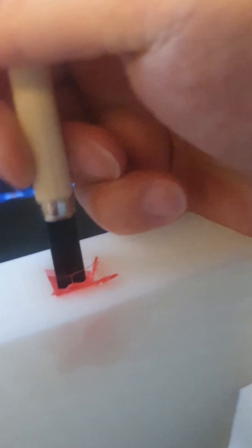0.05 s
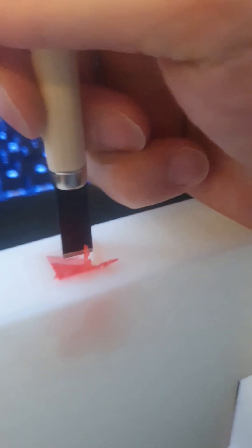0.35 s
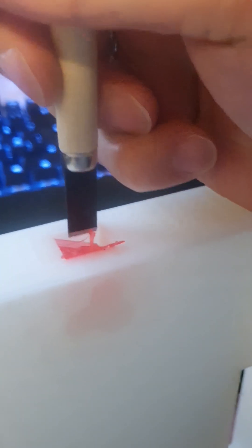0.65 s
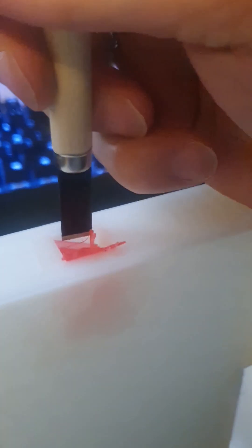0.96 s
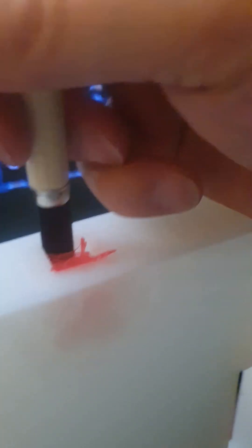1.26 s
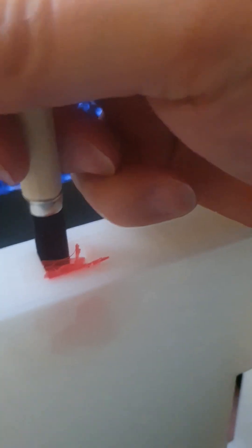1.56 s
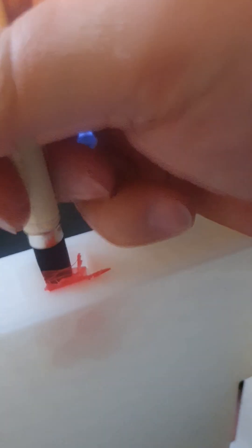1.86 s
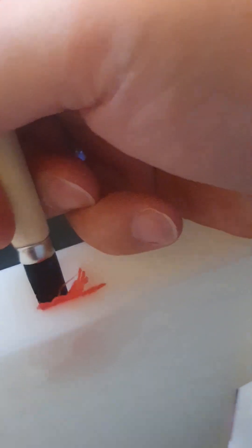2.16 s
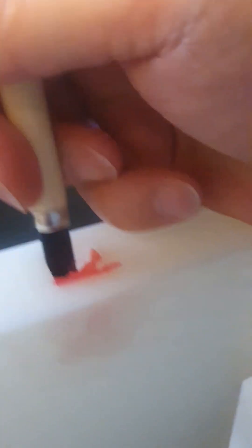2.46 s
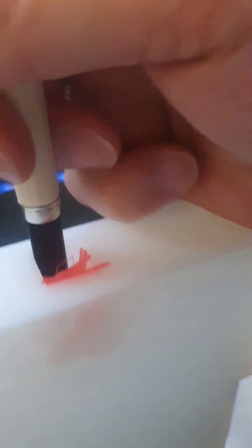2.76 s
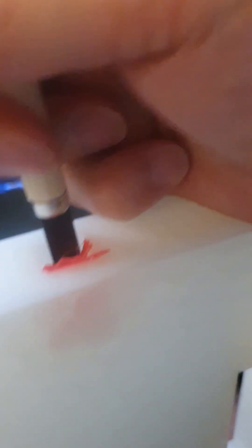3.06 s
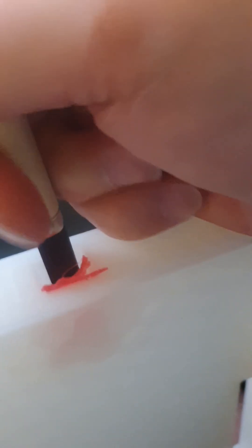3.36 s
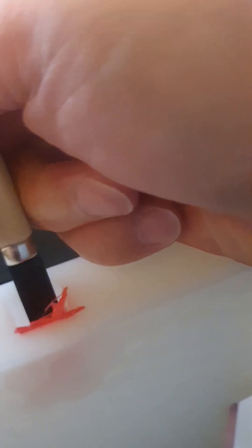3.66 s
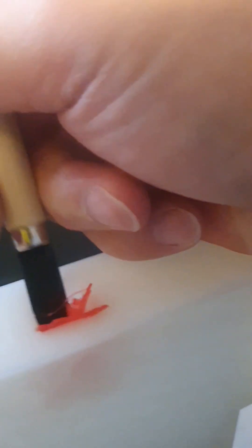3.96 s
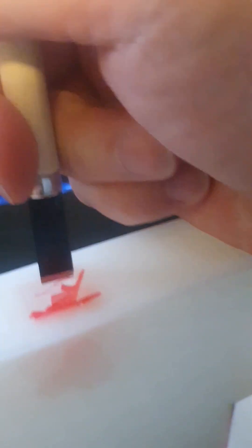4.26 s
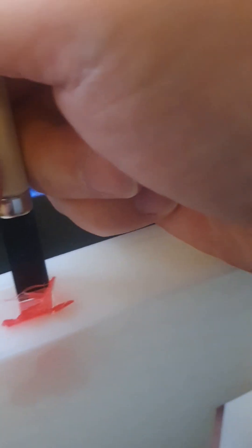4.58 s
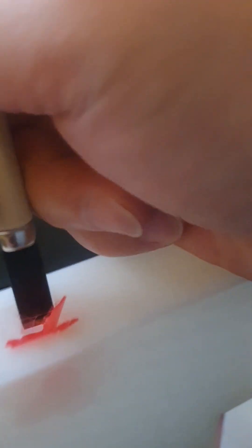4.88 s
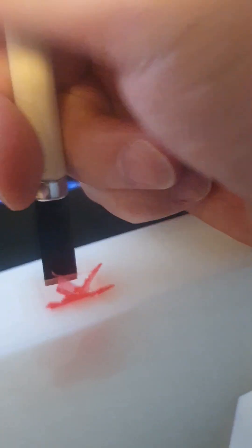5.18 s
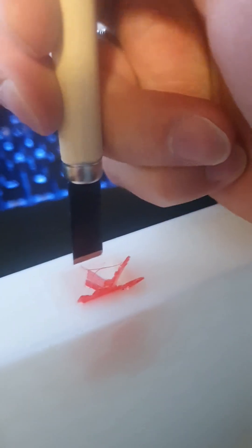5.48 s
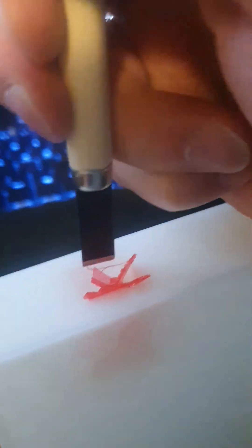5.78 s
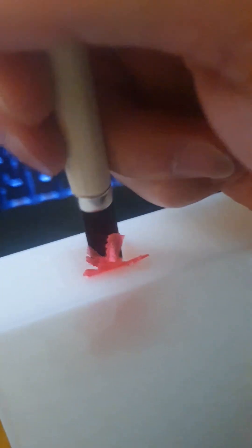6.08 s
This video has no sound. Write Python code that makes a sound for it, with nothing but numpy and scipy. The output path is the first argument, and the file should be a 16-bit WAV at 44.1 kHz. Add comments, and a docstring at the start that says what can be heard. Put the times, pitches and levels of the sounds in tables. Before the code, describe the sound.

A small chisel blade pries thin support struts off a hollow plastic 3D print, heard very close in a small room over a quiet, steady computer fan. It opens with a short scrape and a few sharp clicks in the first 0.3 seconds. Sparse light ticks follow, with a small crackle at 1.3 seconds. A loud, bright snap comes at 1.7 seconds, then a hollow knock near 2 and a duller, crunchy scrape until about 2.3. Faint creaks and scattered clicks continue, with a sharp tick near 3 seconds. Around 3.6 a second loud break crunches and knocks, a freed strut rings very briefly, and the blade rasps and creaks until about 4.2. From 4.6 seconds lighter ticks and a soft scrape lead into a faint sliding rub around 5.1 to 5.5. A few small clicks and a brief scrape come near 6 seconds.

```python
"""Small room, close up: a chisel blade pries thin support struts off a hollow 3D print.
Each break is a quick run of micro-fractures that knock the shell, ring struts and blade, and crack.
In between, the edge sticks and slips over layer lines, the sliding blade creaks, freed struts ring.
A computer fan hums behind. The treble sinks in five short spells."""
import sys
import numpy as np
from scipy import signal
from scipy.fft import rfft, irfft, next_fast_len
from scipy.io import wavfile
from scipy.ndimage import uniform_filter1d, minimum_filter1d

SR = 44100
rng = np.random.default_rng(int(sys.argv[2]) if len(sys.argv) > 2 else 0)


def waveform_to_disk(signal):
    """Save audio, clipped to [-1, 1], as 16-bit WAV at the path in sys.argv[1]."""
    frames = np.transpose(np.atleast_2d(signal))
    scaled = np.clip(frames, -1, 1) * 32767
    samples = np.round(scaled).astype(np.int16)
    wavfile.write(sys.argv[1], SR, samples)


N = 270333
TIME_S = np.arange(N) / SR

# fan air noise (frequency [Hz], relative density [dB])
FAN_SPECTRUM = [(26, -14.5), (45, -1.5), (125, -6.5), (290, -9.5), (461, -7.5), (917, -12), (1990, -19.5),
                (5410, -31), (9000, -51), (13000, -87.5)]
# (frequency [Hz], left minus right [dB])
FAN_PAN = [(40, -11), (130, 4.5), (450, 11), (900, -2.5), (2200, 6.5), (3500, 7.5), (5500, 22.5)]
# (frequency [Hz], left-right correlation [-1..1])
FAN_CORRELATION = [(60, 0.59), (450, -0.43), (950, -0.67), (1600, 0.56), (4000, 0.27)]
# (frequency [Hz], width [Hz], level [dB], left minus right [dB])
FAN_MODES = [(464.8, 14, -54.5, 8), (923.4, 12, -61, 8.5)]
# blade slides (start [s], end [s], resonance [Hz], width [Hz], level [dB])
RUB_STROKES = [(0.017, 0.268, 1570, 1800, -45.5), (2.5, 2.74, 1770, 1490, -51.5),
               (2.848, 3.123, 3040, 130, -51), (3.685, 3.878, 2950, 600, -33.5),
               (5.12, 5.538, 2270, 1500, -49), (5.425, 5.558, 7400, 8100, -56)]
# edge drags (start [s], end [s], level [dB], bite depth [0..1])
SCRAPE_STROKES = [(0.028, 0.128, -38.5, 0.12), (0.123, 0.249, -45.5, 0.15), (0.265, 0.318, -42, 0.39),
                  (0.975, 1.02, -46, 0.19), (1.907, 1.955, -40.5, 0.16), (2.091, 2.215, -31, 0.69),
                  (2.376, 2.394, -41, 0.3), (2.629, 2.692, -48.5, 0.42), (3.296, 3.56, -47, 0),
                  (3.721, 3.98, -33.5, 0.98), (4.111, 4.226, -35.5, 0.33), (4.979, 5.094, -47.5, 0.77),
                  (6.048, 6.125, -41, 0.13)]
# shallow favours crack, deep favours shell (bite depth [0..1], shell [dB], struts [dB], crack [dB])
BITE_MIX = [(0, -18.5, -15.5, -3), (.3, -12, -1, 4), (0.503, -9.5, -1.5, -9), (.7, -2, -0.5, -13),
            (.8, -9.5, 7.5, -23), (1, 3.5, -5.5, -25)]
# hollow print (frequency [Hz], width [Hz], gain [dB])
PRINT_MODES = [(72, 30, -10), (340, 85, -9.5), (543, 75, -6.5), (853, 246, 0.5), (943, 140, 2.5),
               (1140, 150, 0), (1560, 300, -3.5)]
# struts and blade (frequency [Hz], width [Hz], gain [dB])
STRUT_BLADE_MODES = [(1940, 550, -5.5), (2274, 480, -2.5), (2713, 560, -2.5), (3316, 410, -0.5),
                     (3930, 680, -9.5), (5150, 1200, -14)]
# parting plastic (frequency [Hz], width [Hz], gain [dB])
FRACTURE_MODES = [(4636, 900, 1.5), (5610, 810, 5.5), (6900, 1500, -0.5), (7850, 1900, -4.5),
                  (11290, 6000, -10.5), (14900, 520, -6)]
# supports give way (time [s], length [s], level [dB], bite depth [0..1])
SUPPORT_BREAKS = [(0.125, 0.013, -26.5, 0), (0.1611, 0.001, -20, 0), (0.264, 0.00053, -22.5, 0.57),
                  (0.748, 0.00087, -30, 0.22), (0.929, 0.0039, -34, 0.34), (1.2916, 0.0053, -24, 0.32),
                  (1.3, 0.032, -27.5, 0.25), (1.6214, 0.0016, -30.5, 0.35), (1.7019, 0.017, -12.5, 0.14),
                  (1.762, 0.00023, -37, 0.1), (1.86, 0.004, -26, 0.71), (1.935, 0.00066, -30, 0.32),
                  (1.9488, 0.0078, -19, 0.72), (2.062, 0.0024, -22, 0.48), (2.127, 0.0069, -20, 0.95),
                  (2.136, 0.049, -22, 0.98), (2.146, 0.0022, -20, 0.72), (2.194, 0.00044, -39, 0.57),
                  (2.225, 0.0029, -25.5, 0.46), (2.241, 0.0015, -27, 0.65), (2.355, 0.004, -36, 0.97),
                  (2.9622, 0.0053, -22.5, 0.28), (3.038, 0.0016, -27, 0.04), (3.354, 0.0019, -24.5, 0.18),
                  (3.5232, 0.00033, -20, 0.11), (3.628, 0.048, -26.5, 0.43), (3.651, 0.038, -13, 0.94),
                  (3.664, 0.0044, -16, 0.98), (3.779, 0.00078, -20, 0.93), (3.8053, 0.0024, -22.5, 0.92),
                  (3.95, 0.0021, -28, 0.53), (4.063, 0.0024, -32, 0.7), (4.1012, 0.0019, -25, 0.01),
                  (4.129, 0.0032, -22.5, 0.18), (4.181, 0.0015, -30, 0.33), (4.605, 0.0022, -25.5, 0),
                  (4.78, 0.0064, -36, 0.39), (4.7995, 0.0011, -26, 0.01), (4.893, 0.0033, -28, 0),
                  (4.971, 0.012, -37.5, 0.82), (5.048, 0.0023, -30.5, 0.5), (5.121, 0.025, -36, 0.86),
                  (5.817, 0.0013, -33.5, 0.52), (6.091, 0.0015, -36, 0.23)]
# strut freed or hit (time [s], pitch [Hz], decay to 1/e [cycles], level [dB])
STRUT_KNOCKS = [(0.761, 2155, 3.3, -41.5), (1.953, 993, 9.2, -20.5), (2.687, 1560, 1.5, -40),
                (2.962, 2320, 3.7, -30), (2.962, 5620, 27, -21.5), (3.662, 2037, 33, -18.5),
                (3.936, 1500, 3.4, -35), (4.2385, 2150, 2.5, -38.5), (5.2, 1795, 2.2, -42.5),
                (5.248, 1700, 2.4, -46)]
# treble dips (start [s], end [s], lower edge [Hz])
TREBLE_DIPS = [(1.76, 2.36, 4930), (2.4, 2.609, 3450), (3.573, 4.057, 4310), (4.955, 5.114, 4550),
               (5.115, 5.405, 3300)]
# (frequency [Hz], T60 [s], level [dB])
ROOM_TAIL = [(203, 0.15, -23), (1262, 0.16, -11), (2950, 0.19, -11), (7000, 0.13, -7), (15000, 0.15, -10)]
# right port against left (frequency [Hz], gain [dB])
RIGHT_PORT = [(300, 1), (1700, 1), (2200, 4.5), (2900, -7.5), (4200, -10.5), (6200, -25)]


def from_db(db):
    """Decibels to gain."""
    return 10 ** (np.asarray(db) / 20)


def unit_rms(x):
    """Scale to unit power."""
    return x / np.sqrt(np.mean(x ** 2) + 1e-20)


def at_level(sound, db, window_s):
    """Set each channel's rms over the opening window."""
    power = np.mean(sound[:, :int(window_s * SR)] ** 2, axis=1, keepdims=True)
    return sound * from_db(db) / np.sqrt(power + 1e-20)


def at_hz(points, hz):
    """Interpolate over log frequency."""
    known_hz, values = np.transpose(points)
    return np.interp(np.log(np.maximum(hz, 1)), np.log(known_hz), values)


def butter(x, kind, hz, order=2):
    """Butterworth filter."""
    return signal.sosfilt(signal.butter(order, hz, kind, fs=SR, output="sos"), x)


def resonate(x, hz, width_hz):
    """One resonance, unit peak gain."""
    r = np.exp(-np.pi * width_hz / SR)
    feedback = [1, -2 * r * np.cos(2 * np.pi * hz / SR), r * r]
    return signal.lfilter(np.array([1, 0, -1]) * (1 - r * r) / 2, feedback, x + 1e-18)


def add(track, time_s, sound):
    """Mix a sound into a track."""
    start = max(round(time_s * SR), 0)
    track[:, start:start + sound.shape[1]] += sound[:, :N - start]


def grains(size, per_s, spread_db):
    """Random clicks of uneven size and sign."""
    sizes = from_db(spread_db * np.minimum(rng.exponential(1, size), 4))
    return (rng.random(size) < per_s / SR) * sizes * rng.choice([-1, 1], size)


def evened(paths, share=0.41):
    """Many routes even out the echoes' peaks and notches; causal."""
    size = next_fast_len(2 * paths.shape[1])
    spectrum = rfft(paths, size)
    cepstrum = irfft(np.log(np.abs(spectrum) + 1e-9), size)[:, :size // 2]
    return irfft(spectrum * np.exp(-2 * share * rfft(cepstrum, size)), size)[:, :paths.shape[1]]


def scatter(x, decay_s, echo_db, correlation):
    """Direct sound plus dense early echoes off hand, print and desk, in stereo."""
    t = TIME_S[:SR // 12]
    shared = np.sqrt(correlation) * rng.standard_normal(len(t))
    separate = np.sqrt(1 - correlation) * rng.standard_normal((2, len(t)))
    paths = (shared + separate) * np.exp(-t / decay_s)
    paths *= from_db(echo_db) / np.linalg.norm(paths, axis=1, keepdims=True)
    paths[:, 0] = 1
    return signal.fftconvolve(x[None], evened(paths), axes=1)[:, :len(x)]


def strike(force, modes, detune, spread_db):
    """Ring modes; pitch and strength vary with the contact point."""
    jitter = rng.standard_normal((len(modes), 2))
    ring = 0
    for k, (hz, width_hz, db) in enumerate(modes):
        gain = (-1) ** k * from_db(db + spread_db * jitter[k, 0])
        ring += gain * resonate(force, hz * np.exp(detune * jitter[k, 1]), width_hz)
    return ring


def fan(air_db=-45.5):
    """Steady air noise with two narrow resonances."""
    hz, sides = np.fft.rfftfreq(N, 1 / SR), np.array([[1], [-1]])
    mid, side = rfft(rng.standard_normal((2, N)))
    correlation = at_hz(FAN_CORRELATION, hz)
    side_gain = np.sqrt((1 - correlation) / (1 + correlation))
    spectrum = (mid + sides * side * side_gain) * from_db(at_hz(FAN_SPECTRUM, hz))
    pan = from_db(sides * at_hz(FAN_PAN, hz) / 2)
    air = from_db(air_db) * unit_rms(irfft(spectrum * pan / pan.mean(axis=0), N))
    hum = 0
    for mode_hz, width_hz, db, pan_db in FAN_MODES:
        tone = unit_rms(resonate(rng.standard_normal((2, N)), mode_hz, width_hz))
        hum += from_db(db + sides * pan_db / 2) * tone
    return air + butter(hum, "low", 2100, order=4)


def rubs(slips_per_s=1500, fade_s=0.034):
    """The blade slides under steady pressure; dense small slips keep one resonance creaking."""
    out, t = np.zeros((2, N)), TIME_S[:SR // 2]
    for start_s, end_s, hz, width_hz, db in RUB_STROKES:
        length_s = end_s - start_s
        pressure = np.clip(np.minimum(t, length_s - t) / fade_s, 0, 1)
        force = grains(len(t), slips_per_s, spread_db=1.5) * pressure
        creak = resonate(resonate(force, hz, width_hz), hz, width_hz)
        creak = scatter(creak, decay_s=0.0029, echo_db=3.0, correlation=0.5)
        add(out, start_s, at_level(creak, db, length_s))
    return out


def scrapes(grip_s=0.004, release_s=0.0099, catches_per_s=95, ease_db=-7.5):
    """The edge rasps over layer lines: it grips, the hand eases off, it lets go."""
    out, t = np.zeros((2, N)), TIME_S[:SR // 2]
    for start_s, end_s, db, depth in SCRAPE_STROKES:
        length_s = end_s - start_s
        grip = 1 - np.exp(-t / grip_s)
        release = np.exp(-np.maximum(t - length_s, 0) / release_s)
        pressure = grip * release * from_db(ease_db * t / length_s)
        force = grains(len(t), per_s=4500, spread_db=3.5) * judder(len(t), catches_per_s) * pressure
        add(out, start_s, bite(force, db, depth, push_s=0, window_s=length_s))
    return out


def judder(size, per_s, spread_db=3.5, fade_s=0.0013, floor=0.12):
    """Stick-slip: force jumps at uneven intervals, then drains to a floor."""
    gap_jitter, level_jitter = rng.standard_normal((2, 200))
    gaps_s = np.exp(0.35 * gap_jitter) / per_s
    starts_s, t = np.cumsum(gaps_s) - gaps_s[0], TIME_S[:size]
    latest = np.searchsorted(starts_s, t, side="right") - 1
    return floor + from_db(spread_db * level_jitter[latest]) * np.exp((starts_s[latest] - t) / fade_s)


def bite(force, db, depth, push_s, window_s, tip_depth=0.34, tip_hz=8850):
    """Bite depth shares the force among shell, struts and crack; the tip cracks thinner and brighter."""
    depths, *shares_db = np.transpose(BITE_MIX)
    thinning = np.clip(1 - depth / tip_depth, 0, 1)
    tip_force = force - thinning * butter(force, "low", tip_hz, order=1)
    parts = shell(force, push_s), struts(force), crack(tip_force)
    return sum(at_level(part, db + np.interp(depth, depths, share_db), window_s)
               for part, share_db in zip(parts, shares_db))


def shell(force, push_s, thin_below_s=0.00091):
    """The hollow print knocks; scrapes and the very briefest ticks sound thinner, with less bass."""
    thinning = 1 - min(push_s / thin_below_s, 1)
    force = force - thinning * butter(force, "low", 1200, order=1)
    knock = strike(force, PRINT_MODES, detune=0.039, spread_db=0.4)
    knock = butter(knock, "low", 1900, order=4)
    return scatter(knock, decay_s=0.007, echo_db=-3.0, correlation=0.37)


def struts(force):
    """Struts and blade tick in the midrange."""
    tick = strike(force, STRUT_BLADE_MODES, detune=0.043, spread_db=3.5)
    tick = butter(tick, "low", 4700, order=8)
    tick = butter(tick, "high", 1600, order=3)
    return scatter(tick, decay_s=0.0044, echo_db=6.0, correlation=0.23)


def crack(force):
    """Parting plastic cracks brightly."""
    snap = strike(force, FRACTURE_MODES, detune=0.004, spread_db=1.05)
    snap = butter(snap, "high", 3980, order=3)
    return scatter(snap, decay_s=0.0028, echo_db=3.5, correlation=0.5)


def breaks(ring_s=0.0074, rise_s=0.0007, crumble_s=0.0015, skid_db=-21.5, slips_per_s=140):
    """A support tears in micro-fractures and crumbles; the blade skids on over sparser catches."""
    out, t = np.zeros((2, N)), TIME_S[:SR // 3]
    for time_s, length_s, db, depth in SUPPORT_BREAKS:
        after_s, swell_s = np.maximum(t - length_s, 0), 0.086 * length_s
        tear = (1 - np.exp(-t / (rise_s + swell_s))) * np.exp(-after_s / (crumble_s + swell_s))
        skid = from_db(skid_db) * (t > length_s) * np.exp(-after_s / (2.4 * length_s))
        slips = judder(len(t), max(slips_per_s, 3 / length_s))  # short breaks still slip a few times
        fractures = grains(len(t), per_s=7000, spread_db=2.5) * tear
        catches = grains(len(t), per_s=2500, spread_db=1.0) * skid
        force = slips * (fractures + catches)
        force[int(rise_s * SR)] += 1.1  # first fibre gives way
        add(out, time_s, bite(force, db, depth, push_s=length_s, window_s=length_s + ring_s))
    return out


def knocks(glide=0.07):
    """A strut, sprung free or hit by the blade, rings and sinks in pitch as it straightens."""
    out, t = np.zeros((2, N)), TIME_S[:SR // 10]
    for time_s, hz, cycles, db in STRUT_KNOCKS:
        decay = np.exp(-t * hz / cycles)
        attack = 1 - decay ** 10
        pitch_hz = hz * (1 + glide * (decay - 0.5))
        ring = np.sin(2 * np.pi * np.cumsum(pitch_hz) / SR) * decay * attack
        ring = scatter(ring, decay_s=0.004, echo_db=3.0, correlation=0.36)
        add(out, time_s, at_level(ring, db, window_s=0.023))
    return out


def treble_dips(x, dip_db=-15, edge_ratio=1.23):
    """The treble sinks briefly and returns."""
    out, size = x, next_fast_len(N)
    spectrum, hz = rfft(x, size), np.fft.rfftfreq(size, 1 / SR)
    for start_s, end_s, edge_hz in TREBLE_DIPS:
        gate = uniform_filter1d(1.0 * ((TIME_S >= start_s) & (TIME_S < end_s)), size=600)
        shelf = at_hz([(edge_hz, 0), (edge_hz * edge_ratio, 1), (10000, 1), (13500, 0.7)], hz)
        treble = irfft(spectrum * shelf, size)[:, :N]
        out = out - treble * gate * (1 - from_db(dip_db))
    return out


def room(x, build_s=0.0084):
    """Short diffuse tail in eight bands."""
    t, table, tail = TIME_S[:SR // 2], np.array(ROOM_TAIL), 0
    edges_hz = np.geomspace(60, 17000, 9)
    for low_hz, high_hz in zip(edges_hz, edges_hz[1:]):
        t60_s, db = (at_hz(table[:, [0, k]], np.sqrt(low_hz * high_hz)) for k in (1, 2))
        envelope = from_db(-60 * t / t60_s) * (1 - np.exp(-t / build_s))
        noise = butter(rng.standard_normal((2, len(t))), "band", [low_hz, high_hz])
        tail += from_db(db) * noise * envelope / np.linalg.norm(envelope)
    return signal.fftconvolve(x, tail, axes=1)[:, :N]


def ports(x, in_phase_hz=480, opposed_hz=1000):
    """The right microphone port faces away: antiphase above the bass, treble shaded."""
    left, right = x
    hz = np.fft.rfftfreq(N, 1 / SR)
    lag_rad = np.interp(hz, [in_phase_hz, opposed_hz], [0, np.pi])
    response = from_db(at_hz(RIGHT_PORT, hz)) * np.exp(-1j * lag_rad)
    return np.array([left, irfft(rfft(right) * response, N)])


def scene():
    """Chisel work up close; room, fan and faint hiss behind."""
    work = breaks() + scrapes() + rubs() + knocks()
    hiss = from_db([[-77], [-87]]) * rng.standard_normal((2, N))
    return treble_dips(ports(work + room(work)) + fan() + hiss)


def record(dry, ceiling=0.9, cutoff_hz=16300):
    """Fast peak limiter, then a steep low-pass."""
    max_gain = np.minimum(ceiling / (np.abs(dry).max(axis=0) + 1e-9), 1)
    gain = uniform_filter1d(minimum_filter1d(max_gain, size=45), size=45)
    lowpass = signal.ellip(12, 0.2, 100, cutoff_hz, fs=SR, output="sos")
    return signal.sosfilt(lowpass, dry * gain)


dry = scene()
out = record(dry)
waveform_to_disk(out)
```